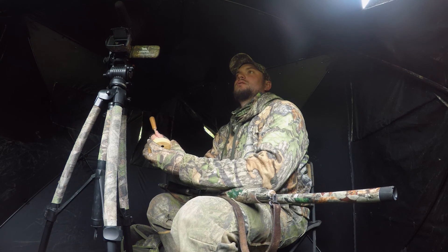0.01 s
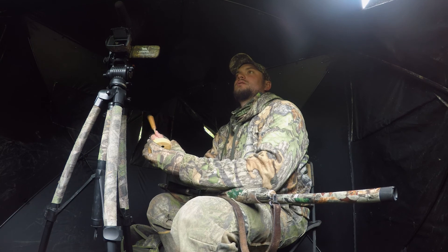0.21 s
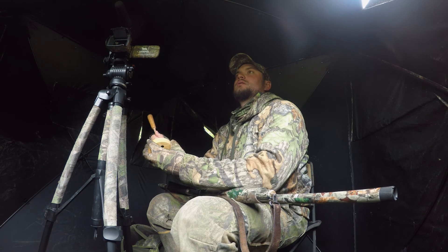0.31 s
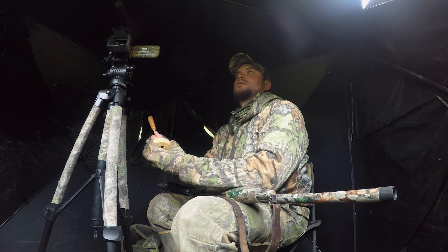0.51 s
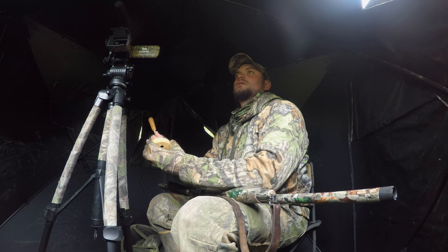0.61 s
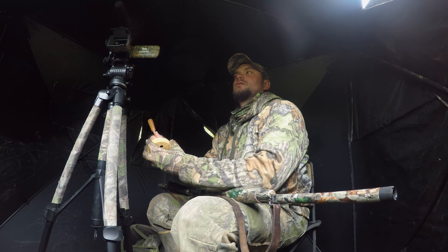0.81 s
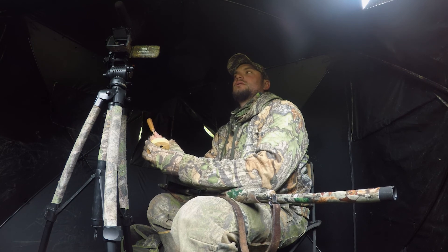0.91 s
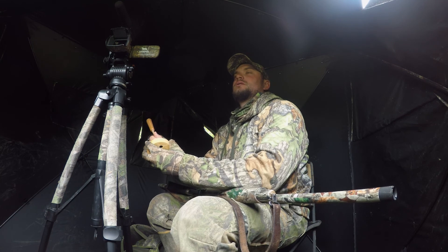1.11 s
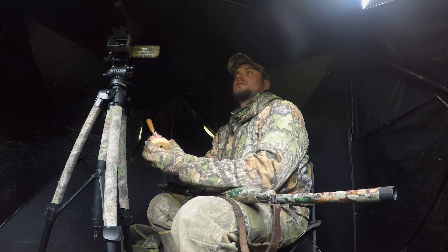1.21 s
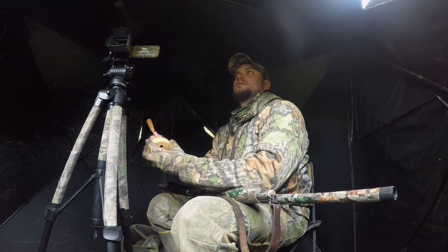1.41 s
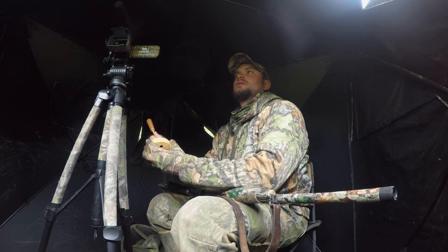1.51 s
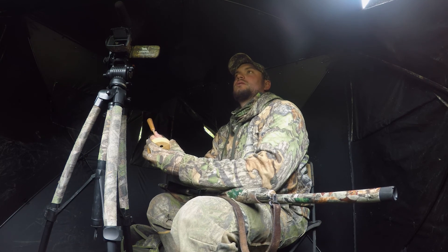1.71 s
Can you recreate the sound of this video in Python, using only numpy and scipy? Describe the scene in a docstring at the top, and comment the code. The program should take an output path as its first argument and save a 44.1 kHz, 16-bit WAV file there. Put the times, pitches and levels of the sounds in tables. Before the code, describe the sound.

One short, squeaky hen-like cluck sounds as a wooden striker slips on a slate call near the microphone. It echoes faintly in the woods outside the hunting blind, followed by a few tiny cloth rustles over quiet outdoor air.

```python
"""A slate pot call gives one sharp cluck: a wooden striker sticks and slips, ringing slate and pot.
The cluck is stereo-widened; a small fabric blind reflects it; the woods echo faintly and ring on.
Soft air noise, a faint low pulse and the fading ring of an earlier cluck lie underneath.
A bright treble brush arrives with the echo; later, cloth rustles a few times.
Gain control ducks the mix at the cluck, then recovers."""
import sys
import numpy as np
from scipy import signal
from scipy.fft import rfft, irfft
from scipy.io import wavfile
from scipy.ndimage import uniform_filter1d

SR = 44100
rng = np.random.default_rng(int(sys.argv[2]) if len(sys.argv) > 2 else 0)


def to_wav(sig):
    """Store sig (one row per channel, or 1-D mono) as 16-bit WAV at the path in sys.argv[1].

    Samples outside -1..1 are clipped; the rate is SR.
    """
    pcm = np.clip(np.atleast_2d(sig), -1, 1) * 32767
    pcm = np.round(pcm).astype(np.int16)
    wavfile.write(sys.argv[1], SR, pcm.T)  # frames by channels


N = 77175

# air noise spectrum: f/Hz, relative level/dB
AIR_SPECTRUM = [(20, 4), (128, 1), (160, -4), (210, -3.5), (270, -9), (310, -7), (638, -6.5), (796, -7.5),
                (1380, -11), (1590, -16), (3000, -24.5), (4680, -28), (6500, -25.5), (9620, -26.5),
                (12000, -32), (15000, -39)]
# left-right likeness of the air noise: f/Hz, correlation
AIR_CORRELATION = [(60, 0.54), (130, 0.58), (290, -0.27), (630, -0.81), (1380, -0.74), (3030, 0.24),
                   (6640, 0.076), (14500, -0.034)]
# rumble contour: t/s, relative level/dB
RUMBLE_CONTOUR = [(0, -1), (.3, 9), (.5, 2), (.7, 4.5), (.9, 7), (1.15, 7.3), (1.4, 4.7), (1.65, 7.3)]
# striker slip rate: t/s, f/Hz
SLIP_RATE = [(.201, 860), (.205, 870), (.208, 860), (.211, 805), (.214, 715), (.217, 660), (.221, 625),
             (.224, 640), (.229, 720), (.235, 840), (.240, 920), (.246, 960), (.252, 1030)]
# stroke drive at the SLIP_RATE times: level/dB
STROKE_DB = [-52, -37, -20, -8, -10, -12, -13, -13, -15, -16, -22, -32, -47]
# slate and pot resonances: f/Hz, width/Hz, level/dB
POT_MODES = [(903, 200, -1), (1260, 110, 3.5), (1513, 138, -1), (1779, 162, -1), (2173, 280, -4),
             (2613, 325, 3), (3583, 150, -8.5), (3860, 550, -25), (5242, 120, -2), (6155, 450, -12),
             (7300, 306, -13.5), (7360, 640, -25), (9090, 470, -34)]
# dead spot of the pot: f/Hz, width/Hz
POT_NOTCHES = [(1960, 160)]
# stereo widening, left over right: f/Hz, level/dB
WIDENING_BALANCE = [(600, 5), (900, -6), (1270, 9.8), (2330, 0.3), (4290, 9.5), (7900, -3.5)]
# stereo widening, left ahead of right: f/Hz, phase/rad
WIDENING_LEAD = [(600, 1.6), (1030, 0.87), (1640, 1.39), (2070, 0.34), (3960, -0.031), (5170, 0.84),
                 (7000, -0.79), (10000, 2)]
# blind's response: f/Hz, tail t60/s, level/dB
BLIND_BANDS = [(600, 0.024, -19), (990, 0.15, -60.5), (1350, 0.12, 1.5), (2310, 0.15, -12),
               (4670, 0.1592, -4), (8760, 0.16, -3)]
# wall bounces: delay t/s, left level/dB, right level/dB
WALL_BOUNCES = [(.0031, -17, -6.5), (.0047, -16, 3), (.0065, -24, 1.5), (.0095, 0, -41.5),
                (.0109, -5.5, -16.5), (.0145, -6.5, -1.5)]
# treble brush with the echo (first two rows), then cloth: t/s, length/s, centre f/Hz, level/dB
BRUSHES = [(0.312, 0.063, 2670, -54), (0.319, 0.064, 6360, -54), (0.527, 0.099, 7280, -62.5),
           (0.877, 0.026, 7050, -52.5), (1, 0.017, 6750, -63), (1.09, 0.04, 6900, -65.5)]

T_S = np.arange(N) / SR
BINS_HZ = np.fft.rfftfreq(N, 1 / SR)
WOODS_HZ, WOODS_WIDTH_HZ, WOODS_T60_S = 1280, 420, 1.6


def gain_of(db):
    return 10 ** (np.asarray(db) / 20)


def unit_rms(x):
    return x / np.sqrt(np.mean(x ** 2) + 1e-20)


def interp_log(points, hz):
    f, value = np.transpose(points)
    return np.interp(np.log(hz + 1), np.log(f + 1), value)


def resonate(x, hz, width_hz):
    """One resonance, unity gain at its centre."""
    r = np.exp(-np.pi * width_hz / SR)
    return 2 * signal.lfilter([1 - r], [1, -r * np.exp(2j * np.pi * hz / SR)], x).real


def band(x, hz, width_hz):
    return resonate(resonate(x, hz, width_hz), hz, width_hz)


def air(level_db=-48, cut_hz=132.4, cut_db=-38, rumble_hz=305, swell_db=2):
    """Steady hiss over a lumpy rumble, thinned sharply below cut_hz."""
    hz = np.fft.rfftfreq(4096, 1 / SR)
    a, b, c, d = rng.standard_normal((N // 1024 + 5, 2049, 4)).T
    corr = np.clip(interp_log(AIR_CORRELATION, hz), -1, 1)[:, None]
    left = a + 1j * b
    spectra = np.array([left, corr * left + np.sqrt(1 - corr ** 2) * (c + 1j * d)])
    spectra *= gain_of(interp_log(AIR_SPECTRUM, hz) + cut_db / (1 + (hz / cut_hz) ** 30))[:, None]
    noise = signal.istft(spectra, nperseg=4096, noverlap=3072)[1][:, :N]
    lumps = unit_rms(uniform_filter1d(uniform_filter1d(rng.standard_normal(N), size=1500), size=1500))
    rumble = signal.sosfiltfilt(signal.butter(2, rumble_hz, fs=SR, output="sos"), noise)
    swell = gain_of(swell_db * lumps + np.interp(T_S, *np.transpose(RUMBLE_CONTOUR)))
    return gain_of(level_db) * unit_rms(noise + rumble * (swell - 1))


def earlier_ring(level_db=-59):
    """The woods still ring from an earlier cluck."""
    ring = unit_rms(band(rng.standard_normal((2, N)), WOODS_HZ, WOODS_WIDTH_HZ))
    return ring * gain_of(level_db - 60 * T_S / WOODS_T60_S)


def thuds(rate_hz=9.75, first_s=.1, tone_hz=45, level_db=-65):
    """Soft, regular low pulse, equal in both channels."""
    offset_s = (((T_S - first_s) * rate_hz + .5) % 1 - .5) / rate_hz
    cycles = offset_s * tone_hz
    return gain_of(level_db) * np.sin(2 * np.pi * cycles) * np.exp(-(cycles / .33) ** 2)


def striker(t, jitter=.027, wobble_db=2.6, catch_s=.21, fade_db_per_s=-170):
    """The tip sticks and slips, slowing then quickening; each slip sheds a burst of grit."""
    rate_wobble, level_wobble = map(unit_rms, uniform_filter1d(rng.standard_normal((2, len(t))), 70))
    knots_s, slip_hz = np.transpose(SLIP_RATE)
    cycles = np.cumsum(np.interp(t, knots_s, slip_hz) * (1 + jitter * rate_wobble)) / SR
    # while the tip catches, slips under -14 dB are duller
    soft_db = np.minimum(np.interp(t, knots_s, STROKE_DB) + 14, 0) * (t < catch_s)
    tilt_db_per_oct = -2.5 + .3 * soft_db
    slips = gain_of(fade_db_per_s * np.maximum(t - catch_s, 0)) * np.cos(2 * np.pi * cycles)
    for k in range(2, 17):
        slips += gain_of(tilt_db_per_oct * np.log2(k)) * np.cos(2 * np.pi * k * cycles)
    bursts = np.exp(-(cycles % 1) / .1) * rng.standard_normal(len(t))
    grit = .45 * gain_of(2 * tilt_db_per_oct + 4.5) * unit_rms(np.diff(bursts, prepend=0))
    drive_db = np.interp(t, knots_s, STROKE_DB, left=-99, right=-99) + wobble_db * level_wobble
    return gain_of(drive_db) * (slips + grit)


def cluck(ring_gain_db=5.5, tick_s=.2102, tick_gain_db=-44, tick_decay_s=.0012):
    """The striker rings slate and pot; its tip breaks free with a tick."""
    t = T_S[:SR // 2]
    drive = striker(t)
    ring = sum((-1) ** k * gain_of(db) * resonate(drive, hz, width_hz)
               for k, (hz, width_hz, db) in enumerate(POT_MODES))
    for hz, width_hz in POT_NOTCHES:
        ring -= .776 * resonate(ring, hz, width_hz)
    ring = signal.sosfilt(signal.butter(4, 560, "high", fs=SR, output="sos"), ring)
    ring = signal.sosfilt(signal.butter(8, 9400, fs=SR, output="sos"), ring)
    tick = np.diff(rng.standard_normal(len(t) + 1))
    tick *= np.exp(-np.maximum(t - tick_s, 0) / tick_decay_s) * (t > tick_s)
    return np.pad(gain_of(ring_gain_db) * ring + gain_of(tick_gain_db) * tick, (0, N - len(t)))


def widen(call):
    """Stereo widening: left-right level and phase difference by frequency."""
    half = gain_of(interp_log(WIDENING_BALANCE, BINS_HZ) / 2)
    half = half * np.exp(.5j * interp_log(WIDENING_LEAD, BINS_HZ))
    return irfft(rfft(call) * np.array([half, 1 / half]), N)


def blind(call, tail_db=-3.5, cut_hz=1150):
    """Wall bounces, then a short tail decaying per band; the cloth lets the lows escape."""
    bands = np.array(BLIND_BANDS)
    noise = rng.standard_normal((2, SR // 3)) * (np.arange(SR // 3) > 500)
    hz, t, spectra = signal.stft(noise, SR, nperseg=128)
    t60_s = interp_log(bands[:, :2], hz)[:, None]
    tail = signal.istft(spectra * gain_of(-60 * t / t60_s), SR, nperseg=128)[1]
    response = gain_of(tail_db) * tail / np.linalg.norm(tail[0])
    for k, (delay_s, *db) in enumerate(WALL_BOUNCES):
        response[:, :1024] += (-1) ** k * gain_of(db)[:, None] * np.sinc(np.arange(1024) - delay_s * SR)
    reflected = signal.sosfilt(signal.butter(3, cut_hz, "high", fs=SR, output="sos"), call)
    coloured = irfft(rfft(reflected) * gain_of(interp_log(bands[:, ::2], BINS_HZ)), N)
    return signal.fftconvolve(coloured[None], response, axes=1)[:, :N]


def woods(call, echo_s=.14, smear_s=.012, echo_db=-48, ring_db=-46):
    """One smeared echo from the tree line and a long dull ring."""
    burst = rng.standard_normal((2, N)) * np.exp(-((T_S - echo_s) / smear_s) ** 2)
    echo = band(burst, WOODS_HZ, WOODS_WIDTH_HZ)
    ring = band(rng.standard_normal((2, N)), WOODS_HZ, WOODS_WIDTH_HZ) * gain_of(-60 * T_S / WOODS_T60_S)
    response = gain_of(echo_db) * echo / np.linalg.norm(echo[0])
    response += gain_of(ring_db) * ring / np.linalg.norm(ring[0])
    return signal.fftconvolve(call[None], response, axes=1)[:, :N]


def brushes():
    """A bright treble brush with the echo, later cloth rustles: quick rise, slower fall."""
    out = np.zeros((2, N))
    for start_s, length_s, hz, db in BRUSHES:
        age = 3 * np.clip((T_S - start_s) / length_s, 0, 30)
        noise = unit_rms(band(rng.standard_normal((2, N)), hz, .4 * hz))
        out += gain_of(db) * age * np.exp(1 - age) * noise
    return out


def scene():
    call = cluck()
    return widen(call) + blind(call) + woods(call) + earlier_ring() + air() + brushes() + thuds()


def record(dry):
    """Gain control ducks above the knee and recovers; a low-pass follows."""
    knee_db, duck_db_per_db, release_db_per_s, edge_hz = -22, .33, 40.5, 15000
    power_db = 10 * np.log10(abs(uniform_filter1d((dry ** 2).mean(0), size=400)) + 1e-12)
    fall_db = release_db_per_s * T_S
    held_db = np.maximum.accumulate(power_db + fall_db) - fall_db
    over_db = uniform_filter1d(np.maximum(held_db - knee_db, 0), size=200)
    ducked = dry / gain_of(duck_db_per_db * over_db)
    lowpass = signal.firwin(511, edge_hz, window=("kaiser", 9), fs=SR)
    return signal.oaconvolve(ducked, lowpass[None], "same")


dry = scene()
out = record(dry)
to_wav(out)
```